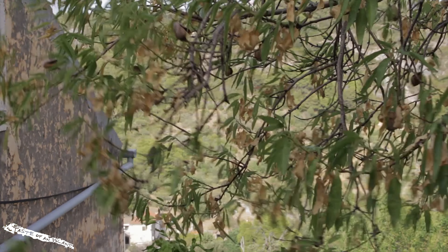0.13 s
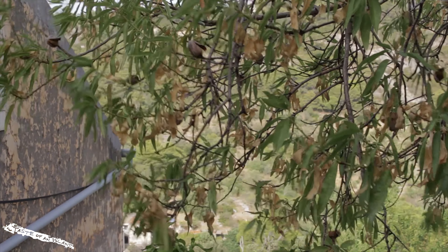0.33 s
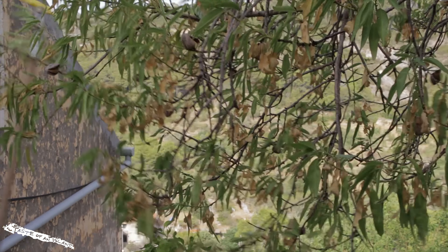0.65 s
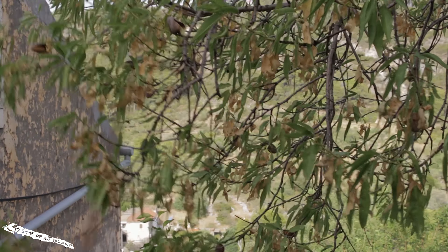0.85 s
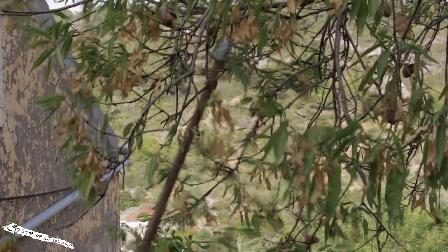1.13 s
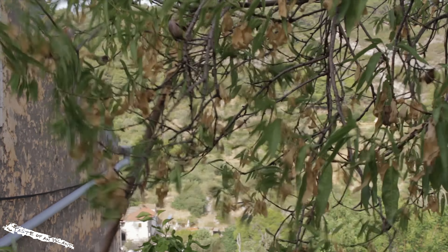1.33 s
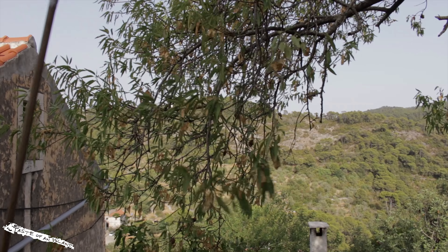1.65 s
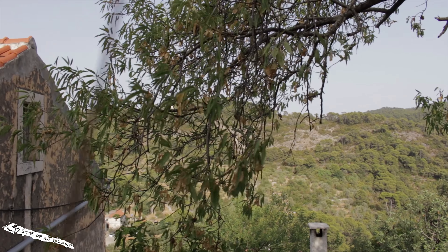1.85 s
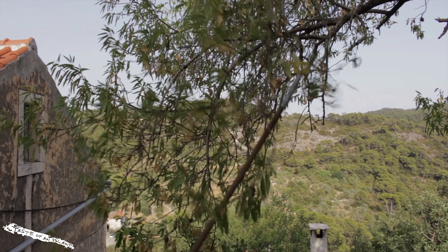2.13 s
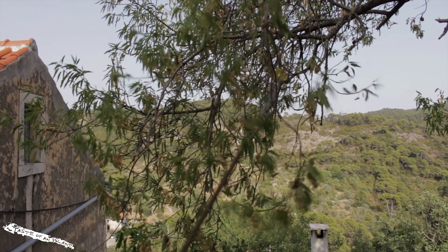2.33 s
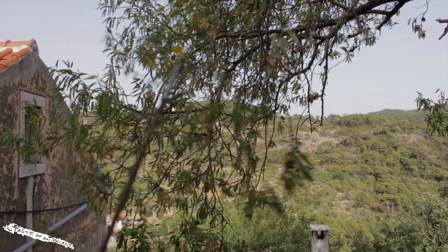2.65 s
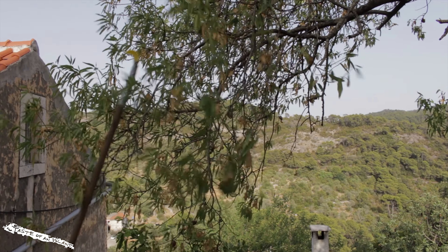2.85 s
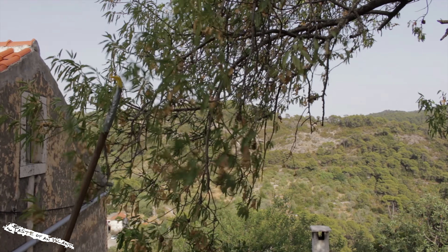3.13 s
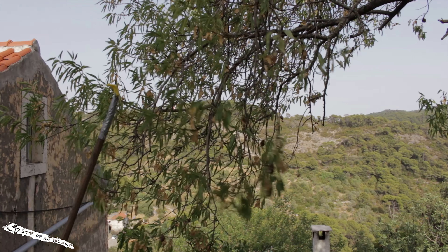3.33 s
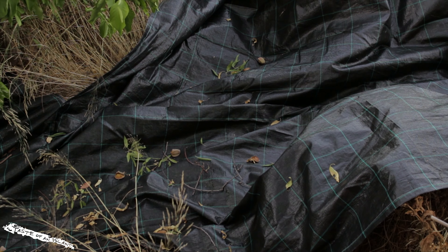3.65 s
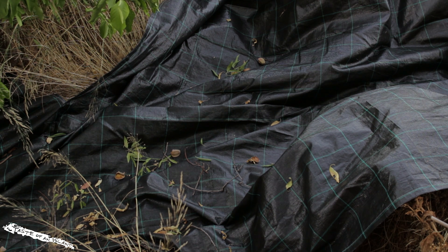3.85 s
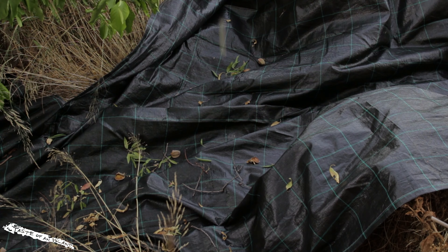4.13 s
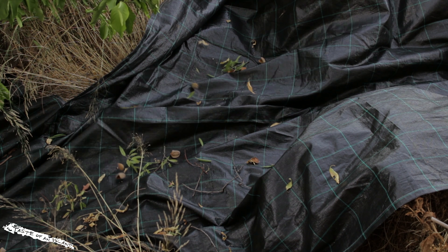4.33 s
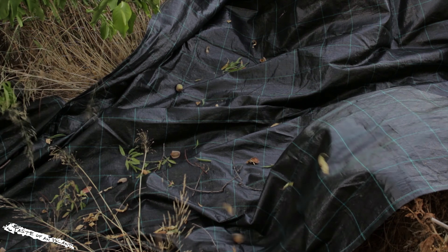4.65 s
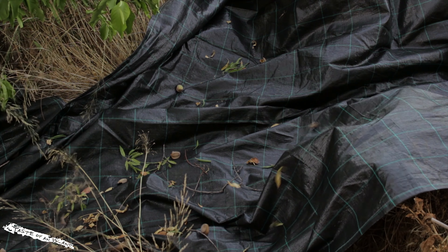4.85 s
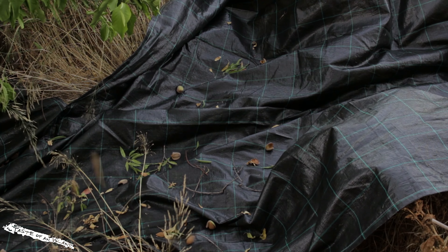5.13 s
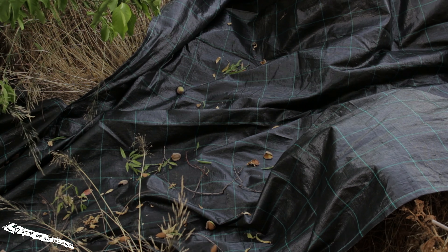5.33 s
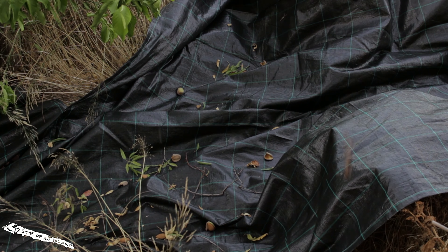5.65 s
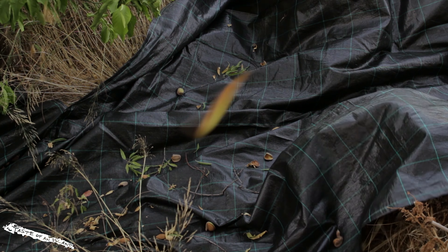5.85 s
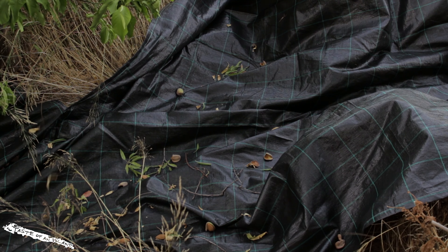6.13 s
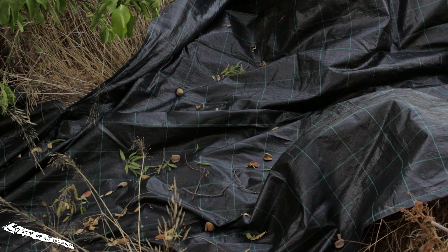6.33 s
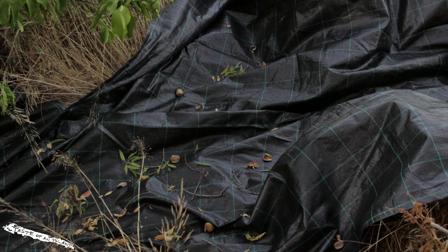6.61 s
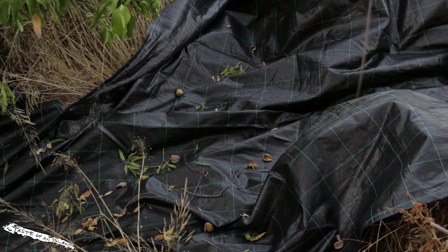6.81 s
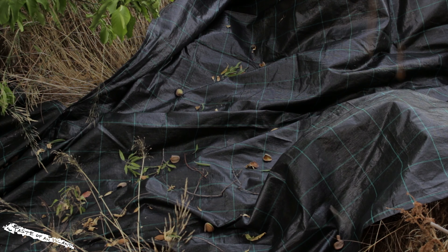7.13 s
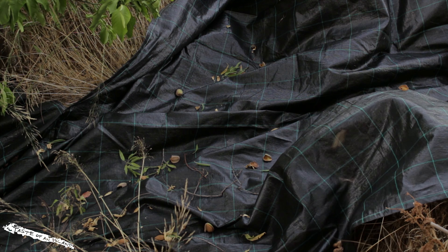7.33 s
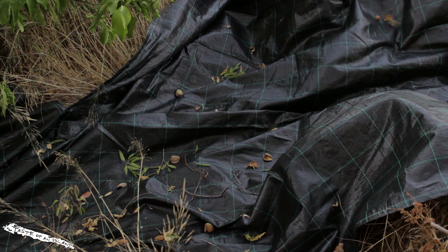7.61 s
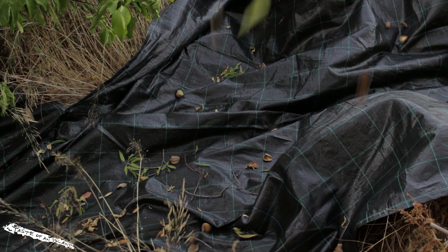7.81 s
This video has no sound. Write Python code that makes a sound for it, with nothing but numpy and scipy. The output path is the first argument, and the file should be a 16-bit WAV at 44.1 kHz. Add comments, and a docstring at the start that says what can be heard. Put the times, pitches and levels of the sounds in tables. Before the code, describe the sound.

Outdoors on a quiet hillside, cicadas buzz steadily over a faint breeze. Soft nut thuds and small ticks begin, then a pole swishes through dry leafy twigs, with hollow knocks and snapping stalks. A heavier thump follows at three seconds, then nuts patter on plastic sheeting and several strike sheet metal with a bright, short ring. Later come sharp paired knocks, rustles and a final loud clack. Stereo microphone, fairly close, slight yard echo.

```python
"""Soft thuds of almonds on a plastic tarp come throughout, amid rustling leaves and a hillside chorus of cicadas.
Nuts also crack on hard things or set sheet metal ringing; from one second a pole swishes through dry leaves too.
Thuds are sinking sine tones with noise; cracks, raps and metal are noise and short pushes ringing in resonances and modes.
Leaves are showers of tiny clicks, cicadas are throbbing noise, and the air is filtered noise.
The house wall and the yard give each crack a short tail of noise."""
import sys
import numpy as np
from scipy import signal
from scipy.fft import rfft, irfft
from scipy.io import wavfile
from scipy.ndimage import uniform_filter1d

SR = 44100
rng = np.random.default_rng(int(sys.argv[2]) if len(sys.argv) > 2 else 0)


def wav_record(signal):
    """Record a signal, one row per channel, as 16-bit PCM in the file named by sys.argv[1]."""
    frames = np.transpose(np.atleast_2d(signal))
    bounded = np.clip(frames, -1, 1)
    # unit amplitude maps onto the largest positive 16-bit level
    quanta = np.round(bounded * 32767).astype(np.int16)
    wavfile.write(sys.argv[1], SR, quanta)


N = 351918
TIME = np.arange(N) / SR  # the whole scene [s]
HIT = TIME[:int(.4 * SR)]  # the span of one hit [s]

# Event levels are relative: each source's own settings shift them further.
# the breeze: (time [s], level [dB])
BREEZE_LEVELS = [(0, -45), (1.2, -48.5), (1.8, -49), (2.9, -54), (3.5, -48), (5.4, -47), (7.98, -46)]
# tone colour of the breeze: (frequency [Hz], level [dB])
BREEZE_COLOUR = [(25, -34), (60, 7.5), (140, -8), (300, 7), (600, 2), (1200, 1.5), (2500, -1.5), (6000, -1),
                 (16000, -56)]
# tone colour of the cicadas: (frequency [Hz], level [dB])
CICADA_COLOUR = [(1200, -33.5), (1900, -14), (2330, -3), (2800, -7), (3700, -12.5), (4200, -4), (4650, 1),
                 (5200, -0.5), (6000, -7), (7500, -13.5), (10000, -25.5), (16000, -36)]
# the chorus grows very slightly
CHORUS_DB, CHORUS_SWELL_DB_PER_S = -35, 0.0174

# flurries of dry leaves as branches swing back: (time of the height [s], level [dB], half length [s])
LEAF_FLURRIES = [(0.03, -45, 0.11), (0.83, -35.5, 0.013), (1.24, -33, 0.17), (2.5, -50, 0.14),
                 (3.464, -39, 0.41), (4.12, -43, 0.084), (4.944, -43.5, 0.6), (5.945, -39.5, 0.2),
                 (6.75, -42, 0.098), (7.16, -38, 0.59), (7.963, -36, 0.093)]
LEAVES_AT_REST_DB = -55.5
# strokes of the pole through the twigs: (time [s], level [dB], length of the push [s])
POLE_STROKES = [(1.0, -26, 0.094), (2.023, -25.5, 0.051), (2.083, -19.5, 0.028), (5.6, -31, 0.14),
                (6.63, -34, 0.12)]
STROKE_ATTACK_S, STROKE_T60_S = 0.015, 0.5  # the swish ends soon after the push
SWAY_DB, SWAY_T60_S = -11.5, 2.75  # the branch swings on
# dry twigs snapping: (time [s], level [dB])
TWIG_SNAPS = [(2.301, -30), (2.56, -30), (2.588, -29.5), (2.893, -34), (3.262, -33.5), (4.115, -34.5),
              (7.694, -28.5)]
# tone colour of the rustling leaves: (frequency [Hz], level [dB])
RUSTLE_COLOUR = [(200, -30), (700, 0.5), (1500, 1), (3500, 3), (7000, 5.5), (10000, 1), (16000, -13)]
# tone colour of the twigs under the pole: (frequency [Hz], level [dB])
TWIG_COLOUR = [(60, -40), (200, -6.5), (500, -4.5), (1400, 0.5), (3000, 0.5), (6000, 0), (10000, -0.5),
               (16000, -16)]

# light bounces further off: (time [s], level [dB], pitch [Hz], ring t60 [s])
NUT_BOUNCES = [(3.103, -30, 1090, 0.23), (3.232, -33, 1570, 0.071), (3.668, -39.5, 693, .05),
               (3.756, -36, 447, .17), (3.912, -41, 780, 0.13), (4.112, -34, 983, 0.094),
               (6.827, -36.5, 1060, 0.045), (7.066, -36.5, 1020, .04), (7.187, -37, 1060, .04),
               (7.324, -29, 960, 0.027)]

# nuts hitting sheet metal: (time [s], tick level [dB], tick pitch [Hz], yard echo [dB], ring level [dB],
# centre of the modes reached [Hz], their spread [octaves])
METAL_HITS = [(4.257, -8, 2430, -3.5, -20, 2470, 1.06), (4.353, -15, 2980, 13, -21, 2200, 0.45),
              (4.601, -15, 3830, 7.5, -21.5, 2460, .15), (4.801, -13, 5650, 5, -29, 1090, 0.77),
              (4.888, -9, 4750, -1, -22, 3320, .085), (5.951, -26, 1640, 7, -40.5, 1630, 0.15),
              (6.009, -27.5, 2800, 13, -45.5, 1610, 0.062)]
# ways the metal vibrates: (frequency [Hz], level [dB], t60 [s])
METAL_MODES = [(820, -7, .4), (1066, 3, .36), (1580, -11, .9), (1739, -9, .7), (1858, -7, .65),
               (2040, -9, .6), (2223, -6, .5), (2369, -2, .6), (2482, -2, .6), (2579, -1, .6),
               (2724, -7, .6), (2950, -5, .7), (3240, -7, .8), (3540, -6, .45), (3741, -11, .5),
               (3978, -7, .3), (4226, -6, .3), (4780, -1, .35), (5900, -6, .35)]
METAL_PAN_DB = 2

# bright ticks of shell or pole glancing off something hard:
# (time [s], level [dB], pitch [Hz], yard echo [dB], left minus right [dB])
BRIGHT_TICKS = [(0.221, -21, 3500, 4.5, -1.5), (0.477, -26.5, 2800, -1, -1), (0.587, -27, 3770, 2, -1),
                (2.043, -23, 5570, -9, 3), (4.195, -20, 3120, -23, 3), (4.218, -27, 3080, -19, 2),
                (5.6, -18.5, 3460, -13, -3), (6.628, -18.5, 3380, -23, 1), (6.981, -28, 5240, 7, -1),
                (7.081, -28, 4860, 2, 0), (7.243, -19, 3160, -2, 0), (7.283, -25.5, 5250, 4, -1),
                (7.695, -25, 3940, 2, -3), (7.907, -13, 5040, 9, 2), (7.942, -11.5, 4900, 2, 3)]
TICK_T60_S, TICK_BODY_DB = 0.041, -8  # a tick is nearly all crack
# hollow raps on wood or firm ground: (time [s], level [dB], pitch [Hz], yard echo [dB])
HOLLOW_RAPS = [(0.81, -33, 2210, -1), (1.057, -19, 1160, 3), (2.264, -31, 1820, -10),
               (2.817, -27.5, 1530, 1), (3.038, -21, 1490, 1), (4.029, -31.5, 1120, -5),
               (5.065, -27, 850, -6), (5.612, -13, 1770, -6.5), (6.637, -13, 1870, -6),
               (7.446, -29.5, 1470, -12), (7.913, -17, 2000, 6), (7.939, -16.5, 1570, 2)]
# crack and low slap follow the strength of the rap
RAP_T60_S, RAP_CRACK_DB, RAP_SLAP_DB, RAP_PAN_DB = 0.017, -3.5, -3, -1
# tone colour of the body of a knock: (frequency [Hz], level [dB])
KNOCK_BODY_COLOUR = [(150, -12), (450, -17.5), (800, -0.5), (1600, 8), (2300, 7.5), (3200, -19),
                     (6000, -37)]
# tone colour of its sharp crack: (frequency [Hz], level [dB])
KNOCK_CRACK_COLOUR = [(900, -29.5), (2000, -1), (2800, 4), (4000, 3), (6000, -0.5), (8000, -10.5),
                      (12000, -19.5), (16000, -40)]

# soft thuds of nuts on the tarp, and the low thump under some raps:
# (time [s], thud level [dB], slap level [dB], middle of the thud's sinking pitch [Hz])
SOFT_THUDS = [(0.027, -30.5, -35.5, 240), (0.075, -34.5, -33, 358), (0.262, -40, -43, 195),
              (0.297, -40, -36, 258), (0.34, -35, -35, 256), (0.379, -34, -42, 410), (0.807, -28, -31, 248),
              (2.816, -33.5, -31, 296), (3.039, -17.5, -21.5, 268), (3.083, -27, -35, 402),
              (3.154, -28, -32, 300), (4.28, -40, -34, 207), (4.58, -31, -26, 218),
              (4.653, -35, -30.5, 266), (4.688, -35.5, -30, 380), (4.707, -27.5, -24.5, 376),
              (4.723, -31.5, -36, 364), (4.819, -34, -29, 232), (4.857, -28, -25, 338),
              (4.995, -31.5, -24.5, 248), (5.066, -27.5, -27, 260), (5.786, -27.5, -22.5, 239),
              (5.808, -28, -36, 242), (7.266, -28, -25.5, 215), (7.336, -22, -25.5, 158),
              (7.534, -37.5, -36, 340), (7.646, -36, -29, 337), (7.664, -35.5, -39, 350),
              (7.86, -26, -21.5, 343), (7.871, -21.5, -42, 250)]
# tone colour of slapped plastic or bark: (frequency [Hz], level [dB])
SHEET_COLOUR = [(100, -8), (400, 3.5), (900, 8.5), (1600, 4.5), (3000, -0.5), (7000, -16.5), (16000, -25.5)]

TOP_HZ = 16100  # the treble is cut above this


def undb(db):
    """Turn decibels into gain."""
    return 10 ** (np.asarray(db) / 20)


def curve(rows):
    """Join (time [s], level [dB]) points into a gain at every sample."""
    return undb(np.interp(TIME, *np.transpose(rows)))


def unit(x):
    """Scale to an average strength (rms) of 1."""
    return x / np.sqrt(np.mean(x ** 2))


def blow(x):
    """Scale a hit to the energy of 10 ms at rms 1."""
    energy = np.mean(np.sum(x ** 2, axis=-1))
    return x / np.sqrt(energy / (SR / 100))


def fade(t, t60):
    """Die away smoothly, losing 60 dB in t60 seconds."""
    return np.exp(-np.log(1000) * t / max(t60, 1e-3))


def colour(x, points):
    """Give a sound the (frequency [Hz], level [dB]) spectrum, with a filter that never acts ahead of time."""
    size = 2048
    hz, db = np.transpose(points)
    bins_hz = np.fft.rfftfreq(size, 1 / SR)
    log_gain = np.log(undb(np.interp(np.log(bins_hz + 1), np.log(hz), db)))
    # folding the cepstrum forward makes the filter minimum phase
    cepstrum = irfft(log_gain)[:size // 2]
    cepstrum[1:] *= 2
    response = irfft(np.exp(rfft(cepstrum, size)))[:size // 2]
    return signal.fftconvolve(np.atleast_2d(x), response[None], axes=1)[:, :x.shape[-1]]


def resonate(x, hz, q):
    """Pass a sound through one resonance, with gain 1 at its centre; a higher q rings longer."""
    return signal.lfilter(*signal.iirpeak(min(hz, .4 * SR), max(q, 1), fs=SR), x)


def stereo(pair, side_db):
    """Mix two unrelated signals as middle and side: more side sounds wider."""
    return unit(pair[0] + undb(side_db) * pair[1] * np.array([[1], [-1]]))


def walk(rate):
    """Drift by chance, smoothly, towards a new value about rate times a second, with a spread near 1."""
    k = int(SR / rate)
    steps = np.repeat(rng.standard_normal(N // k + 1), k)
    return 1.3 * uniform_filter1d(steps, k)[:N]


def pan(x, pan_db):
    """Place a sound by its left minus right level."""
    return x * undb(np.array([[pan_db], [-pan_db]]) / 2)


def add(out, s, sound, pan_db=0):
    """Mix a sound in at time s [s]."""
    i = max(int(s * SR), 0)
    out[:, i:i + sound.shape[-1]] += pan(sound, pan_db)[:, :N - i]


def air(rumble_db=-6, breeze_db=-1):
    """The open hillside: a low rumble nearly alike in both ears, and a slightly wider breeze; both wander in level."""
    rumble = resonate(resonate(stereo(rng.standard_normal((2, N)), -8.5), 159, 0.77), 159, 0.77)
    breeze = colour(stereo(rng.standard_normal((2, N)), -8.0), BREEZE_COLOUR)
    rumble = undb(rumble_db + 0.3 * walk(9.7)) * unit(rumble)
    breeze = undb(breeze_db + 0.1 * walk(7.8)) * unit(breeze)
    return pan(curve(BREEZE_LEVELS) * (rumble + breeze), pan_db=-2.0)


def cicadas(throb_db=2.5, buzz=0.4, count=3):
    """Each distant insect buckles its ribs about 90 to 490 times a second and rasps in quick throbs."""
    chorus = 0
    for pace, rib in rng.random((count, 2)):
        throb_hz = (6.0 + 4 * pace) * (1 + 0.067 * walk(1.994))
        throb = np.sin(2 * np.pi * (rib + np.cumsum(throb_hz) / SR))
        rib_hz = (90 + 400 * rib) * (1 + .04 * walk(20))
        ribs = np.cos(2 * np.pi * np.cumsum(rib_hz) / SR)
        rasp = stereo(rng.standard_normal((2, N)), -4.0)
        rasp = rasp + 0.63 * resonate(rasp, 4400 + 900 * rib, 25)  # its own body resonance
        level = undb(throb_db * throb + 1.2 * walk(1.33))
        chorus = chorus + rasp * (1 + buzz * ribs) * level
    swell = undb(CHORUS_DB + CHORUS_SWELL_DB_PER_S * TIME)
    return pan(swell * unit(colour(chorus, CICADA_COLOUR)), pan_db=-2.5)


def crackle(rate, spread_db):
    """Make tiny clicks of uneven size, about rate of them a second, each from its own direction."""
    chance = rng.random((3, N))
    size = undb(-spread_db * np.log(np.maximum(chance[1], .004)))
    clicks = (chance[0] < rate / SR) * size * rng.choice([-1, 1], N)
    angle = np.pi * (chance[2] - .5) * .7 + np.pi / 4
    return unit(clicks * np.array([np.cos(angle), np.sin(angle)]))


def leaf_motion():
    """Flurries swell and sink over leaves that are never quite still."""
    motion = undb(LEAVES_AT_REST_DB)
    for s, db, half_s in LEAF_FLURRIES:
        motion = motion + undb(db) * np.exp(-((TIME - s) / half_s) ** 2)
    return motion


def twig_motion():
    """Each stroke rises quickly, holds while the pole pushes, drops, and leaves the branch swaying."""
    power = 0
    for s, db, length_s in POLE_STROKES:
        attack = np.clip((TIME - s) / STROKE_ATTACK_S, 0, 1)
        after = np.maximum(TIME - s - length_s, 0)
        push = fade(after, STROKE_T60_S)
        sway = undb(SWAY_DB) * fade(after, SWAY_T60_S)
        power = power + (undb(db) * attack) ** 2 * (push ** 2 + sway ** 2)
    return np.sqrt(power)


def foliage(rustle_db=2, swish_db=0, snap_db=0, flick_db=3.5):
    """Dry leaves brush each other as showers of clicks, swelling in flurries and pole strokes; single stalks snap."""
    flicker = undb(flick_db * walk(35))
    leaves = unit(colour(crackle(rate=3000, spread_db=1.5) * flicker, RUSTLE_COLOUR))
    twigs = unit(colour(crackle(rate=6000, spread_db=3.0), TWIG_COLOUR))
    out = undb(rustle_db) * leaf_motion() * leaves + undb(swish_db) * twig_motion() * twigs
    for s, db in TWIG_SNAPS:
        envelope = fade(HIT, 0.022) + 0.31 * fade(HIT, 0.25)
        split = stereo(rng.standard_normal((2, len(HIT))), -7) * envelope
        add(out, s, undb(db + snap_db) * blow(resonate(split, 6600, 1.0)))
    return pan(out, pan_db=-1.0)


def patter(bounce_db=0, bounce_q=18):
    """A nut skips on and gives one soft, hollow note: a short noise through a resonance."""
    out = np.zeros((2, N))
    for s, db, hz, t60 in NUT_BOUNCES:
        touch = stereo(rng.standard_normal((2, len(HIT))), -23) * fade(HIT, t60)
        note = resonate(resonate(touch, hz, bounce_q) + 0.32 * touch, 1.04 * hz, 1.0)
        add(out, s, undb(db + bounce_db) * blow(note), pan_db=-1.0)
    return out


def knock(body_db, crack_db, hz, t60, echo_db, ring_db=9, ring_q=8, yard_t60=0.3, wall_s=0.0028,
          snap_db=-4, overtone=1.48):
    """A hard contact snaps, rattles and rings two short modes of shell or wood; wall and yard scatter it back."""
    out, noise = 0, rng.standard_normal((4, len(HIT)))
    snap = blow(1. * (HIT == 0))  # the first touch is a single sharp push
    yard = fade(HIT, yard_t60) * (1 - np.exp(-HIT / wall_s))
    # the body is nearly alike in both ears, the crack is wider
    body, crack = (body_db, KNOCK_BODY_COLOUR, -12), (crack_db, KNOCK_CRACK_COLOUR, -4)
    for db, spectrum, side_db in (body, crack):
        rattle = blow(stereo(noise[:2], side_db) * fade(HIT, t60))
        touch = blow(rattle + undb(snap_db) * snap)
        modes = resonate(touch, hz, ring_q) + .5 * resonate(touch, overtone * hz, ring_q)
        echo = stereo(noise[2:], side_db) * yard
        scatter = undb(echo_db) * blow(echo + 1.7 * resonate(echo, hz, 3))
        whole = touch + undb(ring_db) * modes + scatter
        out = out + undb(db) * blow(colour(whole, spectrum))
    return out


def metal(wash_db=-1.5, wash_t60=1.0, clang_db=6, contact_t60=0.05, body_db=-7):
    """After the tick, sheet metal rings in beating modes over a wash of crowded ones; each spot favours its range."""
    out, t = np.zeros((2, N)), TIME[:int(1.2 * SR)]
    for s, tick_db, tick_hz, echo_db, db, centre_hz, octaves in METAL_HITS:
        ring = 0
        for hz, mode_db, t60 in METAL_MODES:
            reach = np.exp(-.5 * (np.log2(hz / centre_hz) / octaves) ** 2)
            phase = 2 * np.pi * rng.random() + .5 * rng.standard_normal((2, 1))
            # a twin close in pitch makes the mode beat
            twin_hz = hz + 6 * rng.standard_normal()
            pair = np.sin(2 * np.pi * hz * t + phase) + .5 * np.sin(2 * np.pi * twin_hz * t - phase)
            ring = ring + reach * undb(mode_db) * fade(t, t60) * pair
        wash = stereo(rng.standard_normal((2, len(t))), -6) * fade(t, wash_t60)
        wash = resonate(resonate(wash, 0.95 * centre_hz, 1.1), 0.95 * centre_hz, 1.1)
        tick = knock(tick_db + body_db, tick_db, tick_hz, contact_t60, echo_db)
        clang = undb(db + clang_db) * (blow(ring) + undb(wash_db) * blow(wash))
        add(out, s, tick, METAL_PAN_DB)
        add(out, s, clang, pan_db=0.5)
    return out


def slap(flutter_db=-21, slap_t60=0.13):
    """Loose plastic or bark is slapped and settles: noise that drops fast, then flutters on more quietly."""
    envelope = fade(HIT, slap_t60) + undb(flutter_db) * fade(HIT, 0.75)
    noise = stereo(rng.standard_normal((2, len(HIT))), -15)
    return blow(colour(noise * envelope, SHEET_COLOUR))


def knocks(rap_body_db=1):
    """Ticks are bright and thin; raps are mostly body, with a low slap under them."""
    out = np.zeros((2, N))
    for s, db, hz, echo_db, pan_db in BRIGHT_TICKS:
        add(out, s, knock(db + TICK_BODY_DB, db, hz, TICK_T60_S, echo_db), pan_db)
    for s, db, hz, echo_db in HOLLOW_RAPS:
        rap = knock(db + rap_body_db, db + RAP_CRACK_DB, hz, RAP_T60_S, echo_db)
        add(out, s, rap + undb(db + RAP_SLAP_DB) * slap(), RAP_PAN_DB)
    return out


def thuds(thud_db=1, slap_db=-1, thud_t60=0.028, flutter_db=-21, sag=0.28, sag_s=0.014):
    """A nut dents the loose tarp: a short thud sinks in pitch, plastic slaps, folds settle; some thump under raps."""
    out = np.zeros((2, N))
    flutter = undb(flutter_db) * fade(HIT, 0.55)
    for s, low_db, high_db, hz in SOFT_THUDS:
        noise = stereo(rng.standard_normal((2, len(HIT))), -22.5)
        # the pitch starts above hz and sinks below it
        pitch = hz * (1 + sag * (np.exp(-HIT / sag_s) - .5))
        envelope = fade(HIT, thud_t60) * (1 - np.exp(-HIT / 0.0025))
        dent = np.sin(2 * np.pi * np.cumsum(pitch) / SR) * envelope
        folds = noise * (fade(HIT, thud_t60) + flutter)
        folds = resonate(resonate(folds, 1.06 * hz, 1), 227, 1)
        thud = blow(blow(dent) + 1.35 * blow(folds))
        landing = undb(low_db + thud_db) * thud + undb(high_db + slap_db) * slap()
        add(out, s, landing, pan_db=-2.0)
    return out


def scene():
    """Put falling nuts and shaken leaves in front of the hillside."""
    return air() + cicadas() + foliage() + patter() + metal() + knocks() + thuds()


def record(dry, low_cut_hz=50):
    """Shed the deep bass, clip any peaks at full scale, then cut the top."""
    thin = signal.sosfilt(signal.butter(2, low_cut_hz, "high", fs=SR, output="sos"), dry)
    held = np.clip(thin, -1, 1)
    return signal.sosfilt(signal.ellip(10, .1, 70, TOP_HZ, fs=SR, output="sos"), held)


dry = scene()
out = record(dry)
wav_record(out)
```